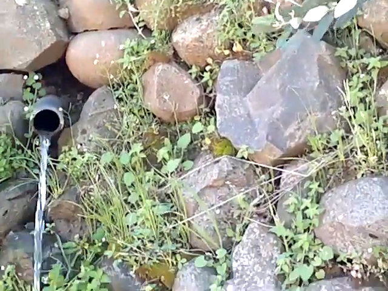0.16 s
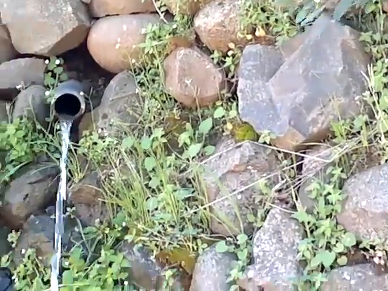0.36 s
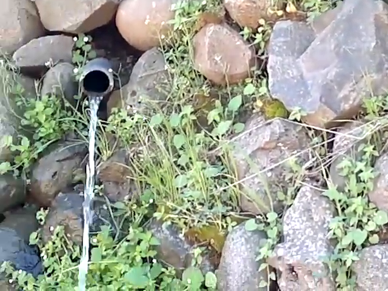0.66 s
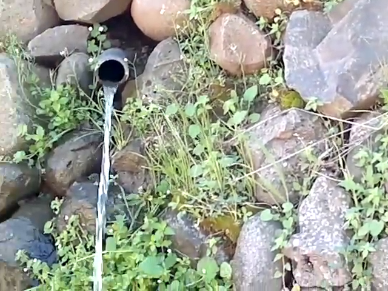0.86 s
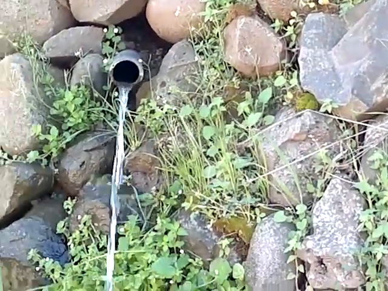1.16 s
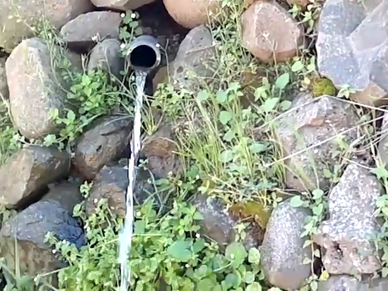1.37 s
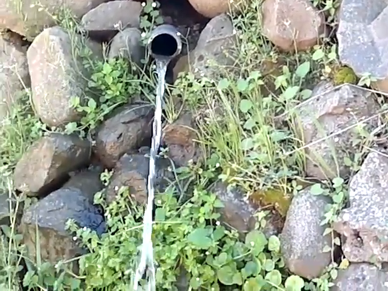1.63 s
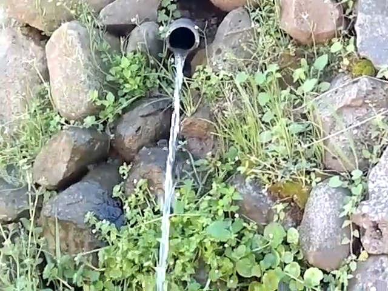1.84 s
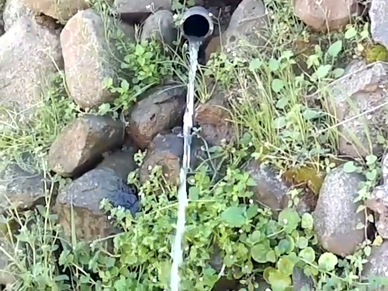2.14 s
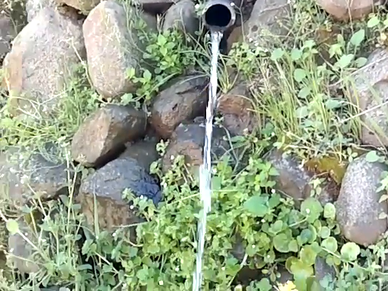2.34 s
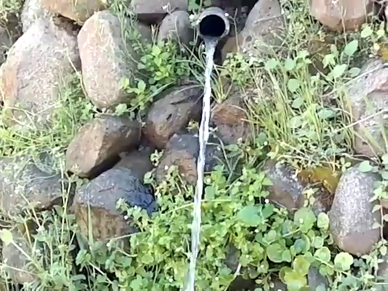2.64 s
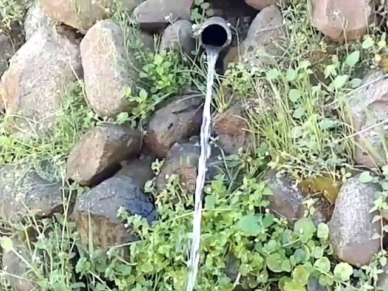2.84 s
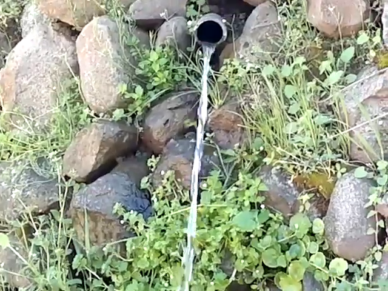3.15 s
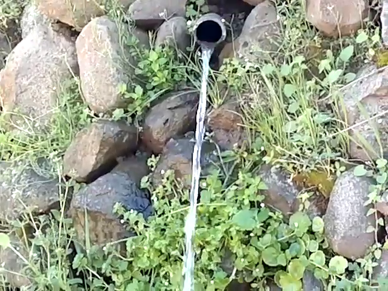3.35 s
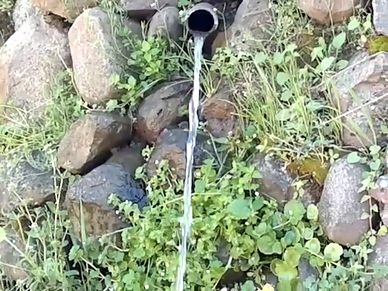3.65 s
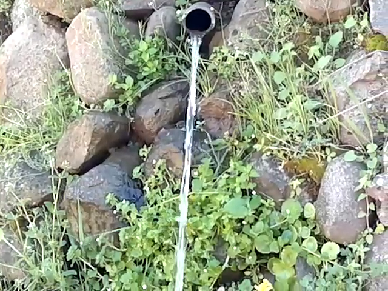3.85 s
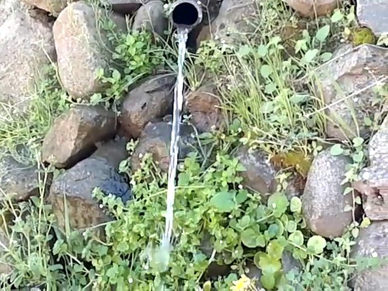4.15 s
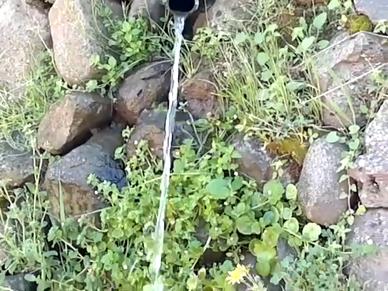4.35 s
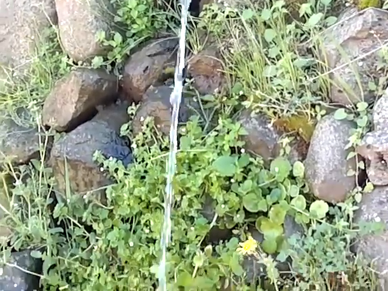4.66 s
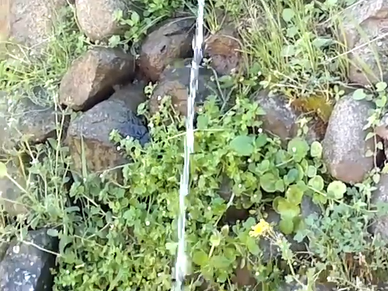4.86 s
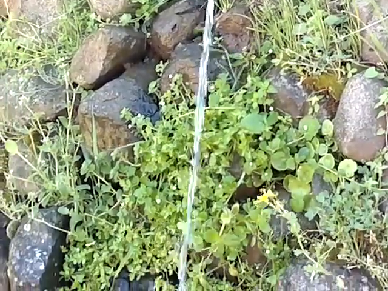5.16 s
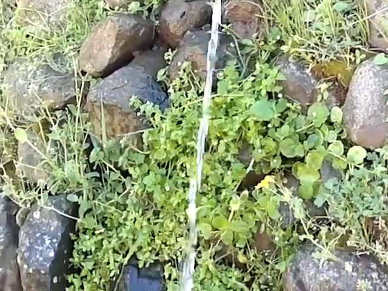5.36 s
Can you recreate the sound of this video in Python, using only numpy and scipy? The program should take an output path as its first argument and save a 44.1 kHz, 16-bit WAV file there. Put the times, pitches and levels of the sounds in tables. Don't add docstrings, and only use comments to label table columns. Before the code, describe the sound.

A thin stream of water splatters on wet rocks, bright and crackling with hollow plops, while wind gusts thump low against the microphone.

```python
import sys
import numpy as np
from scipy import signal
from scipy.fft import rfft, irfft
from scipy.io import wavfile
from scipy.ndimage import uniform_filter1d

SR = 44100
rng = np.random.default_rng(int(sys.argv[2]) if len(sys.argv) > 2 else 0)


def transcribe(signal):
    frames = np.atleast_2d(signal).T
    limited = np.clip(frames, -1, 1)
    pcm = np.round(limited * 32767).astype(np.int16)
    wavfile.write(sys.argv[1], SR, pcm)


def how_loud(loudness_db):
    steps = np.asarray(loudness_db, float) / 20
    return 10 ** steps


N = 242539
TICKS = np.arange(0, N + 32, 32) / SR


def evened(x):
    return x / np.sqrt(np.mean(x ** 2) + 1e-20)


def filled(control):
    return np.interp(np.arange(N) / SR, TICKS, control)


def columns(rows):
    s, *values = np.transpose(rows)
    return [np.interp(np.arange(N) / SR, s, v) for v in values]


def humps(rows):
    return filled(sum(db * np.exp(-((TICKS - s) / half) ** 2) for s, db, half in rows))


def add(mix, s, sound):
    part = mix[round(s * SR):][:len(sound)]
    part += sound[:len(part)]


def coloured(x, points, peaks=(), size=4096):
    hz = abs(np.fft.fftfreq(size, 1 / SR))
    f, db = np.transpose(points)
    db = np.interp(np.log(hz + 1), np.log(f + 1), db)
    db = db + sum(lift / (1 + (2 * (hz - centre) / width) ** 2) for centre, width, lift in peaks)
    log_gain = np.log(how_loud(np.maximum(db, -100)))
    taps = np.fft.ifft(np.exp(np.conj(signal.hilbert(log_gain)))).real
    return signal.oaconvolve(x, taps)[:len(x)]


def band(x, lo_hz, hi_hz):
    return signal.sosfilt(signal.butter(N=3, Wn=[lo_hz, hi_hz], btype="band", fs=SR, output="sos"), x)


def flicker(hz):
    f = np.fft.rfftfreq(N, 1 / SR)
    tilt = (f > 9) / np.sqrt(f + 4) / (1 + (f / hz) ** 4)
    return evened(irfft(rfft(rng.standard_normal(N)) * tilt, N))


def impacts(per_s, spread_db):
    return (rng.random(N) < per_s / SR) * how_loud(spread_db * np.minimum(rng.exponential(1, N), 4))


def bursts(per_s, spread_db, t60):
    power = signal.lfilter([1], [1, -10 ** (-6 / (t60 * SR))], impacts(per_s, spread_db) ** 2)
    return evened(np.sqrt(power) * rng.standard_normal(N))


def pocket(hz, t60, rise):
    t = np.arange(round(t60 * SR)) / SR
    swell = 1 - np.exp(-t * hz * 1.2)
    return how_loud(-60 * t / t60) * swell * np.sin(2 * np.pi * hz * t * (1 + rise * t / t60))


def fizz(lo_hz, hi_hz, per_s, cycles, count=14):
    drops = impacts(per_s, 2.8) * rng.choice([-1, 1], N)
    kind = rng.integers(0, count, N)
    total = np.zeros(N)
    for k, hz in enumerate(np.geomspace(lo_hz, hi_hz, count)):
        rings = signal.oaconvolve(drops * (kind == k), pocket(hz, cycles / hz, 0.18))[:N]
        total += rings / np.sqrt(cycles / np.sqrt(hz))
    return evened(total)


# time in seconds, spray level in dB, hollow gurgle in dB against spray.
FLOW = [(0, -31, -3), (.6, -33.5, -3), (1.3, -32.5, -3), (1.8, -32.5, -3.5), (2.1, -33, -4),
        (2.6, -32.5, -1.5), (3.0, -32, -3), (3.5, -31.5, -2), (4.1, -32, -1.5), (4.5, -33, -2),
        (5.0, -35, -1), (5.5, -34.5, -7)]
# frequency in Hz, level in dB per Hz.
SPLATTER = [(200, -66), (330, 3.5), (700, -3), (1100, -5.5), (1400, 0.5), (3150, 3), (4100, -6),
            (5500, 1.5), (8200, -1), (10000, -3), (13300, 1), (14600, -9.5), (16000, -7), (17500, 3)]
# pitch in Hz, width in Hz, lift in dB.
GAPS = [
    (1104, 96, 12),
    (1774, 210, 5.5),
    (2593, 3600, 5.5),
    (5400, 680, 1),
]
# time in seconds, gurgle lift in dB, half length in seconds.
SURGES = [(.27, 3, 0.056), (.55, 0, 0.071), (.84, 8, 0.0092), (1.29, 6.5, 0.038), (2.05, 8, 0.072),
          (2.43, 5, 0.036), (2.63, 3.5, .035), (2.88, 6, 0.021), (3.47, 1.5, 0.078), (5.135, 8, .015),
          (5.46, 5, 0.034)]
SPRAY_HZ, MIST_HZ, TOP_HZ = 3700, 8000, 19000


def stream():
    spray_db, hollow_db = columns(FLOW)
    slugs, lost_db = flicker(31.6), breaks()
    mist = bursts(450, 2.7, .02) + .5 * fizz(7500, 15500, 2500, 12) + .7 * rng.standard_normal(N)
    spray = bursts(400, 2.6, .022) + .7 * fizz(3500, 8500, 1800, 14) + .7 * rng.standard_normal(N)
    hollow = bursts(300, 2.5, .03) + .62 * fizz(850, 4000, 700, 26) + .7 * rng.standard_normal(N)

    mist = band(coloured(mist, SPLATTER), MIST_HZ, TOP_HZ)
    spray = band(coloured(spray, SPLATTER, GAPS), SPRAY_HZ, MIST_HZ)
    hollow = band(coloured(hollow, SPLATTER, GAPS), 290, 0.91 * SPRAY_HZ)

    mist = evened(mist * how_loud(0.39 * slugs + 1.6 * flicker(40)))
    spray = evened(spray * how_loud(2.0 * slugs + 0.2 * flicker(48)))
    hollow = evened(hollow * how_loud(1.13 * slugs + .5 * flicker(25)))

    mist = how_loud(spray_db - 0.5 + lost_db) * mist
    spray = how_loud(spray_db - 4.5 + 2.02 * lost_db) * spray
    hollow = how_loud(spray_db + hollow_db - 3.5 + 1.94 * lost_db + humps(SURGES)) * hollow
    return mist + spray + hollow


# time in seconds, depth in # dB, half length in seconds.
BREAKS = [(0.083, 4.5, 0.038), (.18, 4.5, 0.029), (0.424, 2, 0.046), (0.663, 2.5, 0.038),
          (0.883, 3.5, 0.011), (1.118, 0.5, 0.12), (1.208, 1, 0.031), (1.491, 0.5, 0.026),
          (1.697, 3, 0.078), (1.985, 3, 0.0079), (2.256, 4.5, 0.016), (2.717, 5, 0.03), (2.805, 2, 0.045),
          (2.941, 2, 0.0091), (3.18, 3, .025), (3.403, 3, 0.018), (3.627, 2.5, 0.089), (3.69, 1.5, .03),
          (3.807, 4.5, 0.018), (3.887, 4, 0.027), (4.157, 2, 0.035), (4.422, 1.5, 0.09), (4.59, 4.5, .025),
          (4.634, 9, 0.0092), (4.896, 1.5, 0.036), (5.126, 4, 0.029), (5.204, 0, 0.013), (5.288, 2, 0.005),
          (5.375, 1, 0.088)]


def breaks():
    return -humps(BREAKS)


# time in seconds, peak in dB, darkness as 3-8 kHz against 8-14 kHz in dB.
SPLATS = [(.3887, -19, -4), (.5409, -11, -11), (.5572, -16, -17), (.684, -16, -18), (.9795, -10.5, -0.5),
          (1.2603, -13, -2), (1.2816, -7.5, -8), (1.3488, -13, 3), (1.4237, -12.5, -2), (1.6411, -11.5, 2),
          (1.7462, -10, 15), (1.7741, -14.5, 16), (2.0039, -14.5, -16), (2.2178, -13, -7),
          (2.3328, -19, -1), (2.6021, -10, 0), (2.6246, -12, 15), (2.6385, -12, -21), (2.7362, -17, -9),
          (2.88, -20, -20), (2.8929, -12, -5), (2.9596, -12, 22), (3.2011, -13, -10), (3.2493, -18, -6),
          (3.299, -10, -15), (3.5112, -14, -16), (4.1054, -28, -13), (4.1802, -13.5, 20),
          (4.8165, -12.5, -5), (5.4346, -12.5, -20)]


def splats():
    out, t = np.zeros(N), np.arange(1200) / SR
    at, spray_db, size, dark, _ = strays(count=60)
    lesser_dark_db = -2 + 4 * (4 * dark - 2)
    slugs = SPLATS + list(zip(at, spray_db + 16 + 3 * size, lesser_dark_db))
    noise = rng.standard_normal((len(slugs), len(t)))
    crack_and_patter = how_loud(-60 * t / .016) + .1 * how_loud(-60 * t / .05)
    puffs = np.sign(noise) * abs(noise) ** .4 * crack_and_patter
    lows = band(puffs, 3000, 8000)
    highs = band(band(puffs, 8000, 14300), 7000, 14300)
    for (s, db, dark_db), low, high in zip(slugs, lows, highs):
        puff = how_loud(dark_db / 2) * evened(low) + how_loud(-dark_db / 2) * evened(high)
        add(out, s, how_loud(db - 4) * puff / abs(puff).max())
    return out


# time in seconds, peak in dB, pitch in Hz, seconds to ring down by 60 dB.
PLOPS = [(.244, -19, 1160, 0.037), (.301, -20.5, 1710, .04), (.498, -21, 1610, 0.03),
         (.6179, -21.5, 1780, 0.034), (.75, -21, 1195, 0.0099), (.8363, -25, 1316, 0.11),
         (1.019, -14, 2490, 0.019), (1.27, -20.5, 1260, 0.038), (1.4267, -12, 1810, 0.023),
         (1.7258, -19.5, 2450, 0.036), (1.7463, -17.5, 2650, 0.02), (2.0324, -20, 3040, 0.01),
         (2.1228, -20.5, 2740, 0.019), (2.1975, -20.5, 2780, 0.045), (2.2869, -17, 1070, 0.037),
         (2.366, -21, 913, 0.041), (2.624, -15.5, 1620, 0.031), (2.64, -21, 1305, 0.052),
         (2.6592, -16.5, 2870, 0.033), (2.97, -18.5, 2740, 0.017), (3.459, -23, 1640, .043),
         (3.4993, -21, 1890, 0.046), (3.746, -20, 1700, 0.012), (4.0608, -14.5, 2510, 0.02),
         (4.1057, -9, 2796, 0.026), (4.242, -21, 1830, 0.011), (4.2755, -16, 1140, 0.025),
         (5.4422, -20, 1755, 0.038), (5.446, -24, 1170, .045), (5.464, -19.5, 1150, 0.029)]


def plops():
    out, t = np.zeros(N), np.arange(500) / SR
    at, spray_db, size, hollow, off = strays(count=28)
    hollow_hz = np.transpose(GAPS)[0][(3 * hollow).astype(int)]
    near_hz = hollow_hz * (1 + 0.065 * (2 * off - 1))
    pockets = PLOPS + list(zip(at, spray_db + 3.5 + 4 * size, near_hz, 0.066 * (1.5 - size)))
    chances = rng.standard_normal((len(pockets), len(t) + 1))
    for (s, db, hz, t60), (rise, *noise) in zip(pockets, chances):
        slap = uniform_filter1d(noise, round(.6 * SR / hz)) * np.sin(2 * np.pi * hz * t)
        add(out, s, how_loud(db - 3.5) * pocket(hz, np.clip(t60, .006, .12), 0.019 + 0.11 * rise))
        add(out, s, how_loud(db - 3.7 - 60 * (t + t60 / 4) / 0.035) * evened(slap))
    return out


def strays(count):
    s, *chance = rng.random((count, 4)).T
    at = (s * (N - 1)).astype(int)
    return at / SR, (columns(FLOW)[0] + breaks())[at], *chance


def stones(x):
    t = np.arange(2600) / SR
    echoes = (rng.random(len(t)) < .05) * rng.choice([-1, 1], len(t))
    taps = echoes * how_loud(-60 * t / .06) * (t > .0015)
    return signal.oaconvolve(x, taps / np.linalg.norm(taps))[:N]


def patchy(x):
    z = signal.stft(x, nperseg=512, noverlap=384)[2]
    field = uniform_filter1d(rng.standard_normal(z.shape[::-1]), size=22, axis=0)
    field = uniform_filter1d(field, size=9, axis=1)
    return signal.istft(z * how_loud(0.92 * evened(field).T), nperseg=512, noverlap=384)[1][:N]


# frequency in Hz, level in dB per Hz.
BUFFET = [(11, -64.5), (18, 0.5), (65, 9), (128, -5.5), (161, -26), (220, -17), (290, -32), (480, -120)]
EDDIES = [(60, -33), (130, 3.5), (190, -5), (300, -12.5), (500, -21.5), (1000, -37), (2000, -48.5)]
TEARING = [(120, -49.5), (280, -1.5), (450, -1), (800, -12), (1300, -14.5), (2000, -30), (4000, -51)]
# time in seconds, tearing level in dB, eddy level in dB.
FLARES = [(.015, -34, -19), (0.212, -37, -9), (0.385, -38, -36), (0.651, -50, -23), (0.778, -44, -23.5),
          (.86, -52, -24), (1.517, -63, -21.5), (1.597, -55, -53), (1.722, -23, -15), (1.771, -34.5, -19),
          (3.151, -41, -31), (3.445, -33.5, -26), (3.559, -60, -12.5), (3.611, -25.5, -46),
          (3.981, -34, -44), (4.076, -28, -33), (4.185, -38, -21), (4.241, -50, -15), (4.382, -29.5, -34),
          (4.494, -30.5, -11), (4.599, -19, -16), (4.634, -16.5, -12.5), (4.715, -20, -19),
          (4.778, -25, -13), (4.806, -42, -5.5), (4.875, -14, -23), (5.099, -28, -22),
          (5.231, -26.5, -16.5), (5.343, -38, -23), (5.451, -35, -22)]
TEAR_S, SWIRL_S = 0.01, 0.014


def wind():
    big, small = gusts()
    lumps, flares, t = flicker(25), np.zeros(N), np.arange(-1800, 1800) / SR
    buffet = steadied(coloured(rng.standard_normal(N), BUFFET, size=16384), .75, size=1800)
    eddies = steadied(coloured(rng.standard_normal(N), EDDIES), .7, size=900)
    tearing = steadied(coloured(rng.standard_normal(N), TEARING), .7, size=300)
    for s, tear_db, eddy_db in FLARES:
        add(flares, s + t[0], how_loud(tear_db - 6.0) * np.exp(-(t / TEAR_S) ** 2))
        add(small, s + t[0], how_loud(eddy_db - 8.5) * np.exp(-(t / SWIRL_S) ** 2))
    push = big * how_loud(2.4 * lumps) * buffet
    push = push + small * how_loud(3.7 * lumps + 0.51 * flicker(39)) * eddies
    tear = flares + how_loud(-25.5) * small
    push = push + tear * tearing * how_loud(2.9 * flicker(127))
    return .75 * np.tanh(push / .75)


def steadied(x, share, size):
    power = uniform_filter1d(x ** 2, size=size) + 0.023 * np.mean(x ** 2)
    return evened(x / power ** (share / 2))


# start in seconds, length in seconds, buffet in dB at the start,
# buffet in dB at the end, small eddies in dB against the buffet.
GUSTS = [(-.02, 0.15, -16, -38, -3.5), (.19, 0.2, -22, -15.5, -13.5), (0.447, 0.12, -34, -24, -19),
         (0.628, 0.16, -27, -25, -23), (0.86, 0.01, -19, -35, -17), (0.939, 0.21, -33.5, -42.5, -10),
         (1.208, 0.42, -37, -22, -9.5), (1.713, 0.21, -14.5, -27.5, -14.5), (1.923, 0.12, -28, -44, -10.5),
         (2.066, 0.041, -48, -52, -3.5), (2.193, 0.03, -48, -48, -14), (2.292, 0.029, -33, -38, -8),
         (2.413, .05, -53, -48, -5.5), (2.56, 0.043, -59, -50, -5), (2.664, 0.18, -36.5, -56, -12),
         (2.904, 0.034, -52, -40, -22), (3.024, 0.16, -35.5, -34.5, -14), (3.34, .1, -38.5, -45, -5.5),
         (3.484, 0.055, -13, -27.5, -16.5), (3.615, 0.098, -23, -29, -11.5), (3.974, 0.77, -21, -22.5, -5),
         (4.556, 0.24, -13, -16, -10), (4.864, 0.057, -7, -17, -15.5), (4.944, 0.52, -23, -22.5, -15)]
RISE_DB_PER_S, FALL_DB_PER_S = 700, 316


def gusts():
    t, buffet, eddies = TICKS, 0, 0
    for s, length, first_db, last_db, eddy_db in GUSTS:
        edges_db = RISE_DB_PER_S * np.maximum(s - t, 0) + FALL_DB_PER_S * np.maximum(t - s - length, 0)
        push = how_loud(np.interp(t, [s, s + length], [first_db, last_db]) - edges_db)
        buffet = np.maximum(buffet, push)
        eddies = np.maximum(eddies, how_loud(eddy_db) * push)
    return filled(buffet), filled(eddies)


def valley():
    colour = [(12, -16), (25, -6.0), (45, -20), (80, -26), (300, -24), (900, -43)]  # (Hz, dB per Hz)
    return how_loud(-53) * evened(coloured(rng.standard_normal(N), colour, size=16384))


def scene():
    hits = splats() + plops()
    water = patchy(stream()) + hits + how_loud(-8.5) * stones(hits)
    return (water + wind() + valley())[None]


def roll_off(x):
    return signal.sosfilt(signal.butter(12, 16670, fs=SR, output="sos"), x)


def record(dry):
    edge = signal.firwin(511, 15850, window=("kaiser", 8), fs=SR)
    mix = signal.oaconvolve(dry, edge[None], "same")
    return roll_off(mix)


dry = scene()
out = record(dry)
transcribe(out)
```